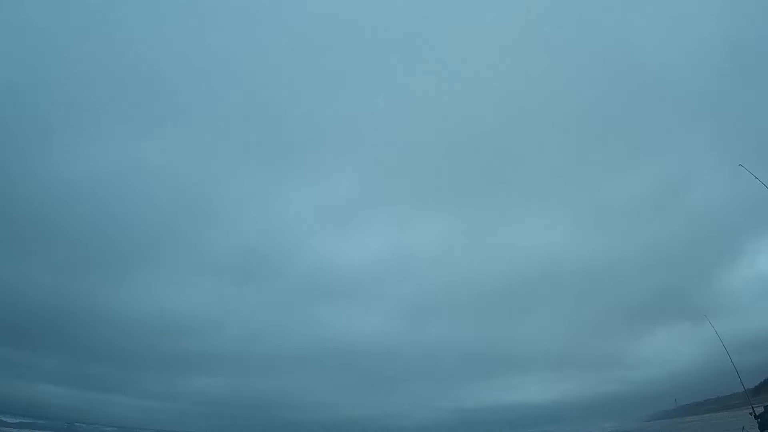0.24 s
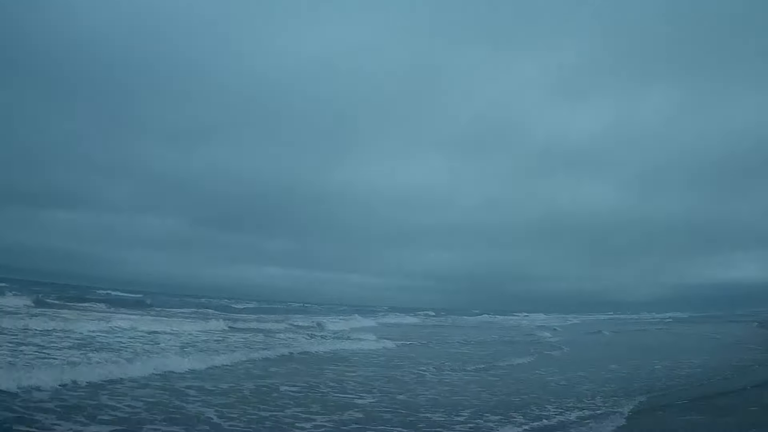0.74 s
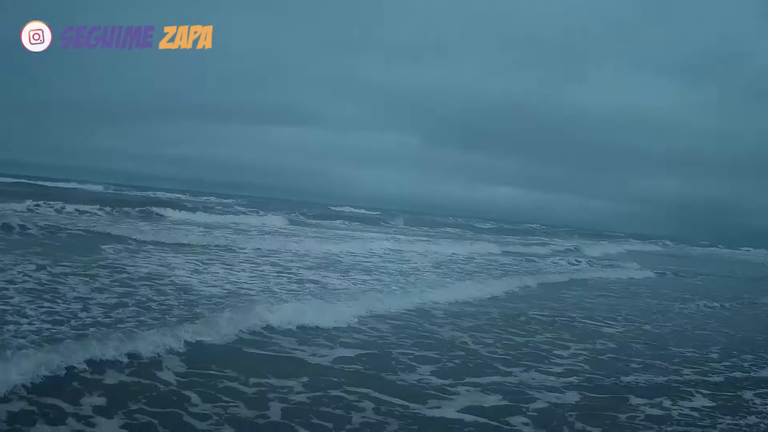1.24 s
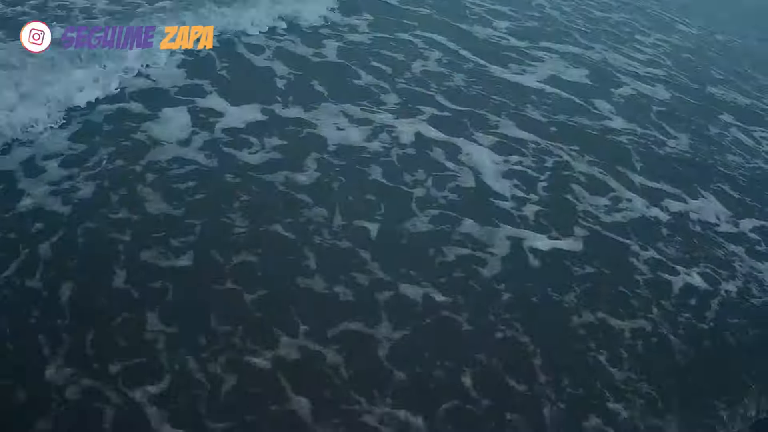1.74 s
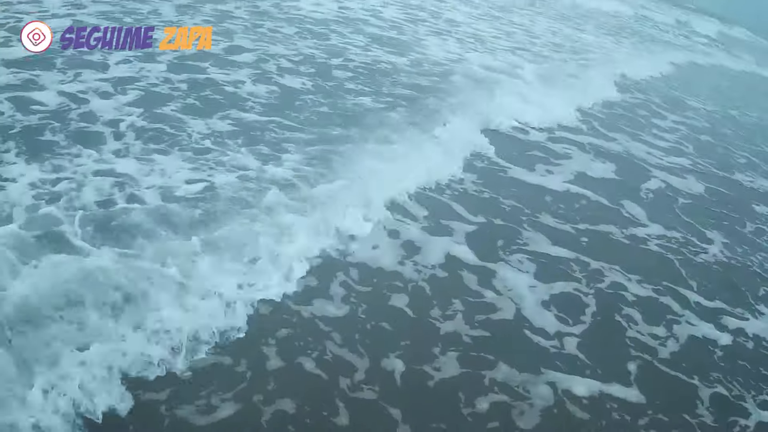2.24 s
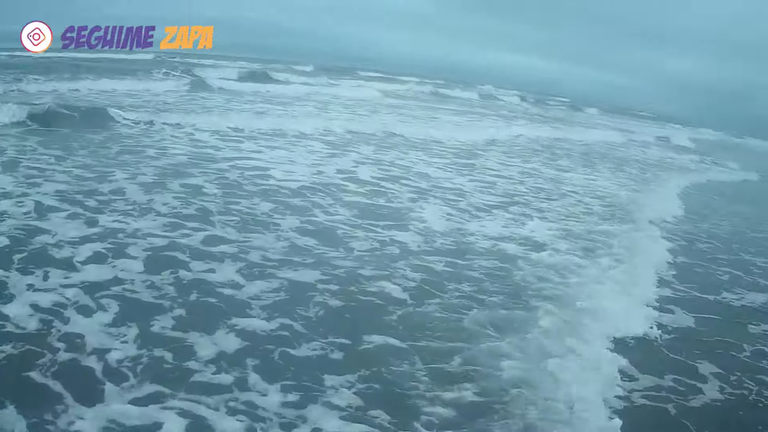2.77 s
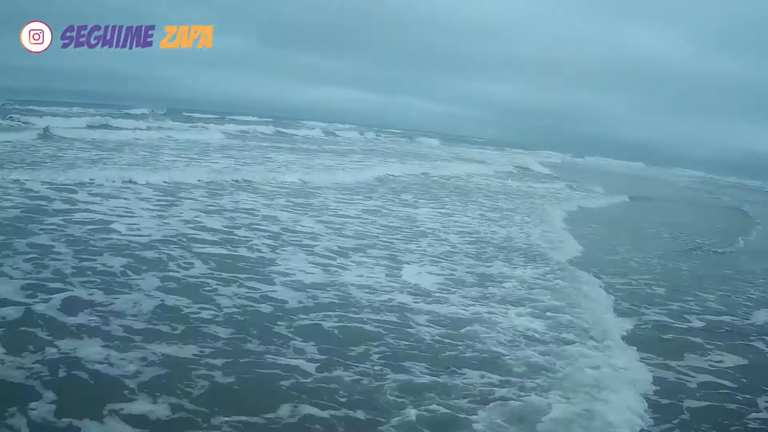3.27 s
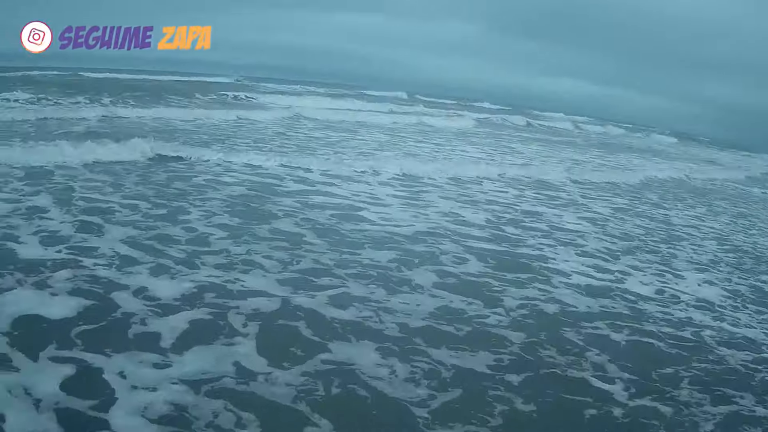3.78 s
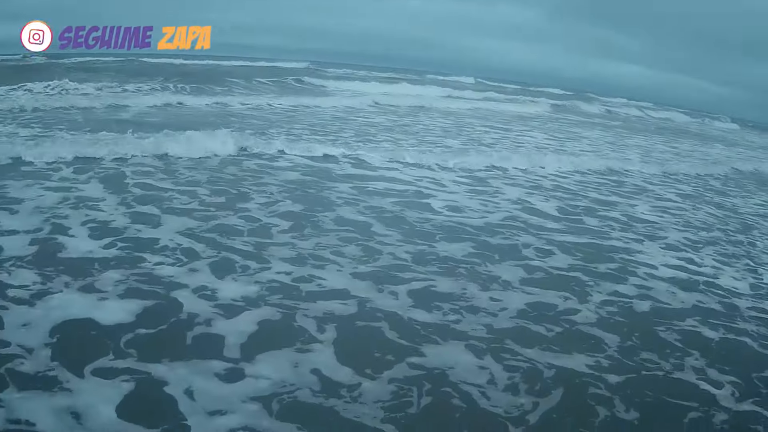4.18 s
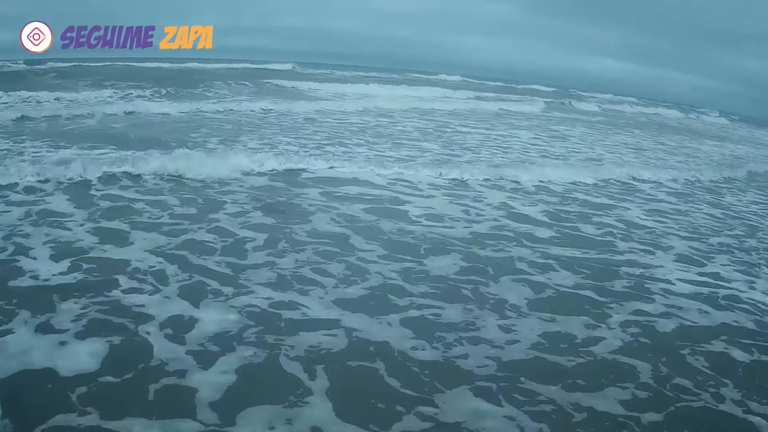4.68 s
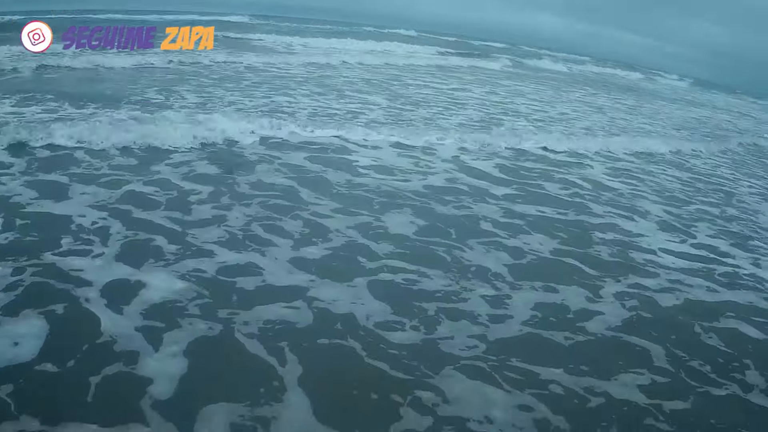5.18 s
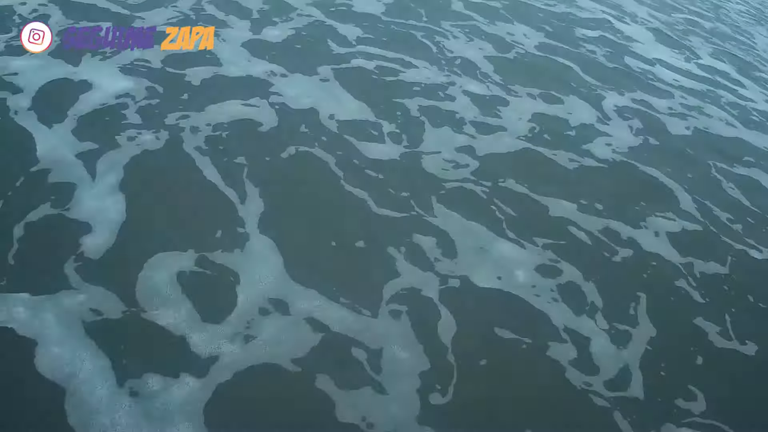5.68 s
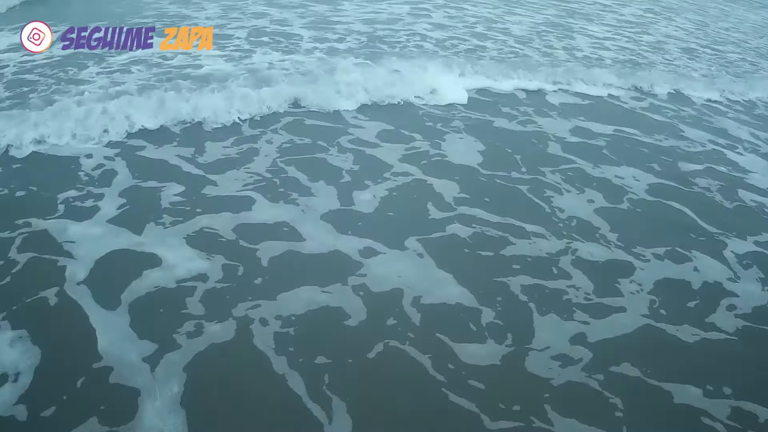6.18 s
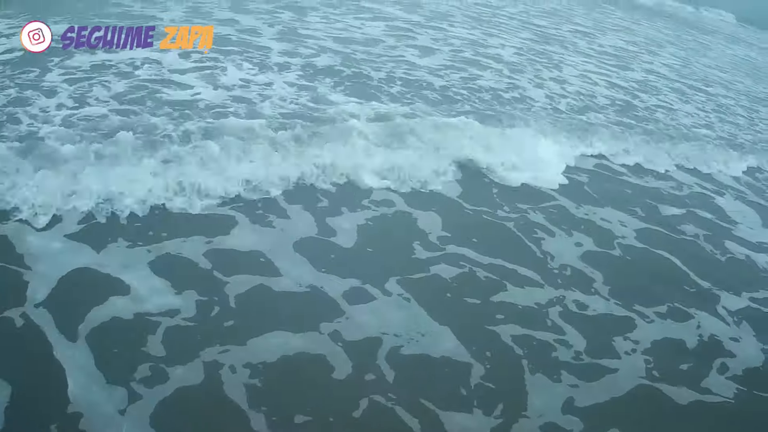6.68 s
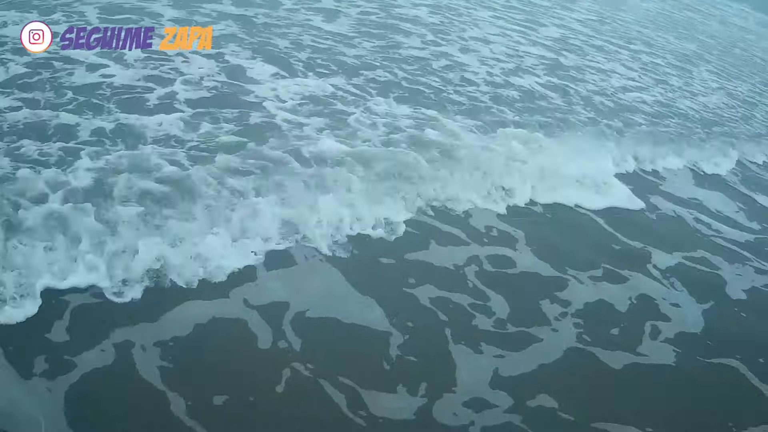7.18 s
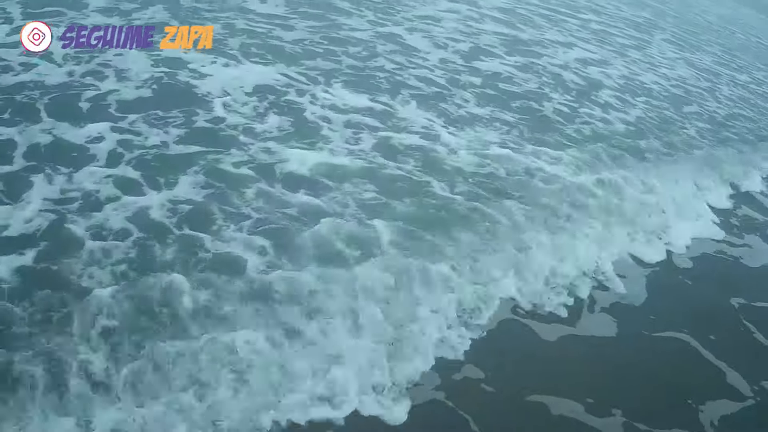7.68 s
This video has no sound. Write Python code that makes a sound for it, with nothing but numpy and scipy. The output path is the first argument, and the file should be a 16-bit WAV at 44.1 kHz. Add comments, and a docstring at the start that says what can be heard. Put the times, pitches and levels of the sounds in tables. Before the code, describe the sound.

A gust of wind roars past on a beach and dies away, leaving surf and a low rumble on the microphone. Close by, line is tugged off a fishing reel: a short run of bright, ringing ratchet clicks, a few lone ticks, then another quick run. Slower clicking follows and speeds up into a high, surging buzz that lasts to the end, with the waves swelling behind it.

```python
"""A gust roars past over beach surf while wind buffets the microphone.
Then line is tugged off a fishing reel: the clicker's pawl drops over a 14-tooth wheel
and each drop rings the reel, first in short runs and lone ticks, then in a surging buzz
whose colour swings with every turn of the spool. Water and sand scatter the ticks back."""
import sys
import numpy as np
from scipy import signal
from scipy.fft import rfft, irfft, next_fast_len
from scipy.io import wavfile
from scipy.ndimage import uniform_filter1d, minimum_filter1d

SR = 44100
rng = np.random.default_rng(int(sys.argv[2]) if len(sys.argv) > 2 else 0)


def int16_out(signal):
    """Quantize to a 16-bit WAV file."""
    q = np.round(np.clip(np.atleast_2d(signal).T, -1, 1) * 32767)
    wavfile.write(sys.argv[1], SR, q.astype(np.int16))


N = 349272


def gain_of(db):
    """Decibels to amplitude."""
    return 10 ** (np.asarray(db) / 20)


def unit_rms(x):
    """Scales to rms 1."""
    return x / np.sqrt(np.mean(x ** 2) + 1e-20)


def spectrum_db(points, hz):
    """Interpolates a spectrum on a log-frequency axis."""
    point_hz, point_db = np.transpose(points)
    return np.interp(np.log(hz + 1), np.log(point_hz + 1), point_db)


def envelope_db(points):
    """Interpolates a level at every sample."""
    return np.interp(np.arange(N) / SR, *np.transpose(points))


def add(mix, start, sound):
    """Mixes a sound in from sample index start."""
    part = mix[start:][:len(sound)]
    part += sound[:len(part)]


def noise(spectrum, level_db, patchy_db, brighten=0., size=1024):
    """Coloured noise with drifting patches; follows level_db, optionally brighter as it swells."""
    hop = size // 4
    hz = np.fft.rfftfreq(size, 1 / SR)
    frames = np.minimum(np.arange(N // hop + 2) * hop, N - 1)
    real, imag, patches = rng.standard_normal((3, len(frames), len(hz)))
    patches = unit_rms(uniform_filter1d(uniform_filter1d(patches, size=14, axis=0), size=9, axis=1))
    treble = np.clip(np.log2((hz + 1) / 700), 0, 2) / (1 + (hz / 5500) ** 4)
    swell_db = (level_db[frames] - np.median(level_db))[:, None]
    gains = gain_of(spectrum_db(spectrum, hz) + patchy_db * patches + brighten * swell_db * treble)
    sound = signal.istft(((real + 1j * imag) * gains).T, nperseg=size, noverlap=size - hop)[1][:N]
    return unit_rms(sound) * gain_of(level_db)


# freq_hz, relative_db
HISS_SPECTRUM = [(100, -3), (5500, -2), (7000, -2), (8300, 1), (9500, -3), (12000, -6.5), (15500, -10)]


def hiss(level_db=-65.5):
    """Faint, steady hiss of the recorder."""
    return noise(HISS_SPECTRUM, np.full(N, level_db), patchy_db=0.5)


# freq_hz, relative_db; the sub-bass is microphone rumble
SURF_AND_RUMBLE_SPECTRUM = [(15, 1), (40, 1), (80, -0.5), (150, -6), (330, 2), (600, -1), (1000, -4.5),
                            (1500, -14), (2000, -19), (3000, -34.5), (4200, -38), (5500, -58), (9000, -65)]
# time_s, relative_db
SURF_SWELLS = [(0.95, -39.5), (1.5, -36), (2.3, -38.5), (3.3, -38.5), (4.45, -40.5), (4.62, -40),
               (4.82, -42.5), (5.65, -35), (6.35, -38.5), (6.92, -34.5), (7.92, -38.5)]


def surf_and_rumble(gain_db=2.36):
    """Surf roars over a deep microphone rumble, swelling and brightening with each wave."""
    level_db = envelope_db(SURF_SWELLS) + gain_db
    return noise(SURF_AND_RUMBLE_SPECTRUM, level_db, patchy_db=1.03, brighten=0.21)


# freq_hz, relative_db
WIND_SPECTRUM = [(10, -9), (30, -20), (60, -4), (115, 0), (200, -3), (320, -7.5), (600, -31), (1500, -38),
                 (5000, -63)]
# time_s, relative_db
WIND_BUFFETS = [(0.0, -40.5), (0.2, -32), (0.33, -39.0), (0.65, -34.0), (0.92, -43.5), (1.8, -30),
                (2.25, -36.5), (2.52, -31.5), (3.0, -42.5), (4.4, -41.5), (4.62, -40), (4.83, -45.0),
                (5.68, -31.0), (5.98, -33), (6.22, -39.5), (6.45, -32), (6.75, -40.5), (7.0, -37),
                (7.92, -37)]


def wind_rumble(gain_db=1.0):
    """Wind buffets the microphone: a low, uneven rumble."""
    return noise(WIND_SPECTRUM, envelope_db(WIND_BUFFETS) + gain_db, patchy_db=1.5)


# both: freq_hz, relative_db
ROAR_SPECTRUM = [(60, -22), (170, -1), (270, 2.5), (480, 5.5), (800, -3), (1200, -4), (1700, -11),
                 (2200, -17), (3000, -26.5), (4000, -31), (5000, -57), (8000, -57), (15000, -70)]
SWISH_SPECTRUM = [(800, -20), (1700, 0), (2600, -1), (3800, 0), (4300, -10), (5200, -17), (9000, -30),
                  (16000, -45)]


def gust(peak_s=0.54, top_s=0.064, rise_db_per_s=68, fall_db_per_s=36, roar_db=-28.5, swish_db=-55.5):
    """One gust swells quickly, rounds off and dies more slowly; it swishes only at its height."""
    t = np.arange(N) / SR
    slope = np.where(t < peak_s, rise_db_per_s, fall_db_per_s)
    below_peak_db = slope * (np.hypot(t - peak_s, top_s) - top_s)
    roar = noise(ROAR_SPECTRUM, roar_db - below_peak_db, patchy_db=1.5)
    swish = noise(SWISH_SPECTRUM, swish_db - 2.7 * below_peak_db, patchy_db=1.5)
    return roar + swish


# centre_hz, width_hz, gain_db
HOUSING_BANDS = [(5160, 110, -2.5), (7400, 90, -3), (10700, 130, -2), (12000, 140, -4), (12630, 130, -1),
                 (12900, 130, 0), (14480, 260, -7), (15350, 130, 4)]


def mic_housing(x):
    """The microphone's housing carves narrow dips and a peak into the treble."""
    size = next_fast_len(N + 2048)
    hz = np.fft.rfftfreq(size, 1 / SR)
    colour_db = sum(db * np.exp(-((hz - centre) / width) ** 2) for centre, width, db in HOUSING_BANDS)
    return irfft(rfft(x, size) * gain_of(colour_db), size)[:N]


# freq_hz, relative_db
SCATTER_SPECTRUM = [(2000, 4.5), (2800, 13), (3500, -1), (4200, 0), (4700, 5), (5500, 5.5), (12000, 9.5)]


def beach_scatter(x, gain_db=-22.5, t60_s=0.28, delay_s=0.011, lumpy_db=1.0, size=SR // 3):
    """Rippled water and sand scatter each tick back as a faint, bright, lumpy tail."""
    t, hz = np.arange(size) / SR, np.fft.rfftfreq(size, 1 / SR)
    grit, lumps = rng.standard_normal((2, size))
    lumps = unit_rms(uniform_filter1d(lumps, size=70))
    tail = grit * gain_of(lumpy_db * lumps - 60 * t / t60_s) * (t > delay_s)
    colour = gain_of(gain_db + spectrum_db(SCATTER_SPECTRUM, hz))
    tail = irfft(rfft(tail / np.linalg.norm(tail)) * colour)
    return x + signal.oaconvolve(x, tail)[:N]


# peak_s, added_teeth_per_s, rise_s, fall_s
LINE_TUGS = [(1.394, 58.4, 0.144, 0.126), (1.541, 37.1, 0.082, 0.367), (3.748, 97.2, 0.173, 0.07),
             (3.826, 65.3, 0.039, 0.105), (3.966, 46.8, 0.085, 0.2), (4.536, 19.2, 0.113, 0.06),
             (5.004, 17.0, 0.136, 0.116), (5.352, 20.4, 0.157, 0.35), (5.587, 61.7, 0.105, 0.055),
             (5.742, 139.0, 0.031, 0.054), (5.824, 152.1, 0.039, 0.205), (6.068, 53.0, 0.071, 0.019),
             (6.176, 84.3, 0.036, 0.134), (6.375, 82.1, 0.166, 0.051), (6.494, 86.1, 0.033, 0.073),
             (6.735, 152.1, 0.091, 0.219), (6.924, 63.2, 0.022, 0.034), (7.038, 103.8, 0.047, 0.158),
             (7.289, 210.1, 0.101, 0.092), (7.549, 124.8, 0.076, 0.027), (7.659, 168.7, 0.08, 0.072),
             (7.757, 113.9, 0.029, 0.056), (7.917, 160.9, 0.075, 0.016)]


def spool_speed(t, steady):
    """Teeth per second in one spin: the line's steady pull plus a bell-shaped surge per tug."""
    return steady + sum(added * np.exp(-((t - peak) / np.where(t < peak, rise, fall)) ** 2)
                        for peak, added, rise, fall in LINE_TUGS if t[0] < peak < t[-1])


# start_s, extra_force_db; lone ticks as the spool creeps, and the first drop of the last spin
SINGLE_TICKS = [(1.8994, 0.5), (1.9753, 0), (2.0958, 1.5), (2.3772, 1.6), (2.7098, 1), (3.0585, 0),
                (3.2858, 0), (3.4308, -0.3), (4.303, 0.5), (5.6557, -1.5)]
# start_s, end_s, steady_teeth_per_s
SPOOL_SPINS = [(1.2451, 1.85, 2.2), (3.5077, 4.22, 2.0), (4.3848, 4.68, 14.8), (4.7495, 5.64, 23.5),
               (5.6806, 7.92, 61.7)]


def pawl_drops():
    """Times and extra forces: single ticks listed apart (mostly lone ticks as the spool creeps), one drop per
    tooth as it spins."""
    drops = list(SINGLE_TICKS)
    for start_s, end_s, steady in SPOOL_SPINS:
        t = np.arange(start_s, end_s, 1 / SR)
        teeth_passed = np.floor(np.cumsum(spool_speed(t, steady)) / SR)
        drops += [(drop_s, 0) for drop_s in t[np.diff(teeth_passed, prepend=-1) > 0]]
    return np.transpose(sorted(map(tuple, drops)))


def pawl_blows(count, size, scrape_hz=7400, rough_share=0.12, rise_s=0.00068, decay_s=0.0018,
               body_hz=3730, lag_hz=920):
    """Spectra of the blows: a clean midrange knock, a gritty scrape of steel in the treble."""
    t, hz = np.arange(size) / SR, np.fft.rfftfreq(size, 1 / SR)
    fade = np.exp(-t / decay_s) * (1 - np.exp(-t / rise_s))
    scrape = rfft(rng.standard_normal((count, size)) * fade / np.linalg.norm(fade), axis=1)
    # all-pass: the body takes a few cycles to swing, so its range lags the treble
    swing = body_hz ** 2 - hz ** 2 + 2j * lag_hz * hz
    knock = np.conj(swing) / swing
    clean_share = (1 - rough_share) / (1 + (hz / scrape_hz) ** 8)
    return np.sqrt(clean_share) * knock + np.sqrt(1 - clean_share) * scrape


TOOTH_COUNT = 14
# centre_hz, width_hz, relative_db, swing_db, swing_phase_teeth, glide_share
REEL_MODES = [(1337, 253, -22.5, 2.5, 8.5, 0.045), (2011, 174, -14, 4, 4, -0.03),
              (2496, 270, -23, 1.5, 8.5, 0.032), (3419, 145, -5, 2.5, 12.5, 0.0091),
              (3853, 333, -5, 0, -0.1, -0.025), (4256, 286, -0.5, 2, 3, -0.0042),
              (4787, 235, -11, 4.5, 8, 0.00049), (6320, 1500, -33.5, -2.5, -0.5, 0.15),
              (6780, 1180, -22.5, 2.5, 6.5, 0.049), (7800, 580, -25.5, 1, 11.5, -0.013),
              (9390, 630, -28, -0.5, 7, -0.0051), (10030, 1130, -29, -2.5, 1, 0.058),
              (11550, 830, -27.5, 1.5, 9, -0.011), (12640, 790, -26, -1, -1, 0.0061),
              (13350, 740, -31, -8, 0.5, 0.023), (14000, 640, -21.5, 2, -6.5, -0.0058),
              (15300, 450, -33, -1.5, -1, 0.0038)]


def reel_ring(tooth, creep, size, scatter_db=0.55, detune_share=0.004, steepness=1.65):
    """One ring spectrum per drop; the wheel runs off centre, so the modes swing once a turn."""
    hz = np.fft.rfftfreq(size, 1 / SR)
    # a creeping pawl seats differently each time and rings shorter
    looseness, damping = 1 + 1.67 * creep, 1 + 0.068 * creep
    power = 1e-5  # floor between modes
    for centre_hz, width_hz, db, swing_db, phase_teeth, glide_share in REEL_MODES:
        louder, sharper = rng.standard_normal((2, len(tooth), 1)) * looseness
        turn = np.cos(2 * np.pi * (tooth[:, None] - phase_teeth) / TOOTH_COUNT)
        pitch_hz = centre_hz * (1 + glide_share * turn + detune_share * sharper)
        offset = (hz - pitch_hz) / (width_hz * damping)
        skirt = (1 + np.log(4) * offset ** 2 / steepness) ** -steepness
        power = power + (gain_of(db + swing_db * turn + scatter_db * louder) * skirt) ** 2
    log_gain = np.log(power) / 2
    mirrored = np.concatenate([log_gain, log_gain[:, -2:0:-1]], axis=1)
    return np.exp(np.conj(signal.hilbert(mirrored, axis=1)))[:, :len(hz)]  # minimum phase


def clicker(gain_db=3.0, swing_db=2, hardest_tooth=1.73, worn_db=0.7, uneven_db=0.1,
            creep_gap_s=0.024, full_drop_db=2.08, late_share=0.007, jitter_s=25e-6, size=1024):
    """Each pawl drop rings the reel; the force swings once a turn, and no two teeth wear alike."""
    times_s, force_db = pawl_drops()
    tooth = np.arange(len(times_s)) % TOOTH_COUNT
    gap_s = np.minimum(np.gradient(times_s), creep_gap_s)
    creep = gap_s / creep_gap_s
    worn, late = rng.standard_normal((TOOTH_COUNT, 2))[tooth].T
    uneven, jitter = rng.standard_normal((len(times_s), 2)).T
    times_s = times_s + late_share * late * gap_s + jitter_s * jitter
    wobble_db = swing_db * np.cos(2 * np.pi * (tooth - hardest_tooth) / TOOTH_COUNT) + worn_db * worn
    # a creeping pawl drops fully: harder, with less wobble
    drop_db = full_drop_db * creep + wobble_db * (1 - 0.71 * creep)
    gains = gain_of(gain_db + force_db + drop_db + uneven_db * uneven)
    spectra = pawl_blows(len(times_s), size) * reel_ring(tooth, creep[:, None], size)
    lead = size // 16  # room for the blow's soft start
    clicks = np.roll(irfft(spectra, axis=1), lead, axis=1)
    clicks *= signal.windows.tukey(size, 2 * lead / size)
    clicks /= np.linalg.norm(clicks, axis=1, keepdims=True)
    out = np.zeros(N)
    for start_s, gain, click in zip(times_s, gains, clicks):
        add(out, round(start_s * SR) - lead, gain * click)
    return out


def scene():
    """The reel close by, sea and wind behind it."""
    reel = beach_scatter(clicker())
    return mic_housing(reel + surf_and_rumble() + gust() + wind_rumble() + hiss())[None]


def record(dry, ceiling_db=-6.0, cutoff_hz=15800):
    """A quick limiter evens out the hardest ticks; a low-pass limits the band."""
    allowed_gain = np.minimum(1, gain_of(ceiling_db) / (abs(dry) + 1e-9))
    limited = dry * uniform_filter1d(minimum_filter1d(allowed_gain, size=300), size=200)
    lowpass = signal.firwin(255, cutoff_hz, window=("kaiser", 9), fs=SR)
    return signal.oaconvolve(limited, lowpass[None], "same")


dry = scene()
out = record(dry)
int16_out(out)
```